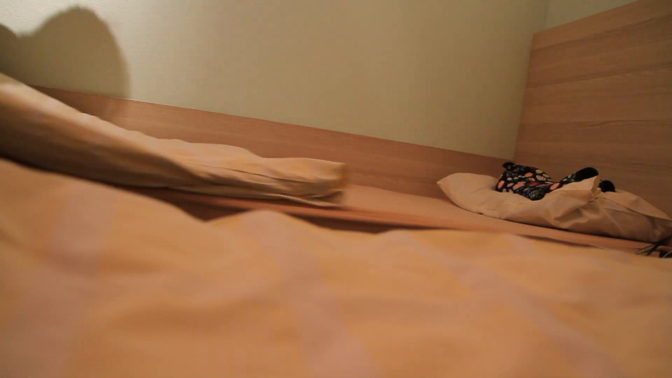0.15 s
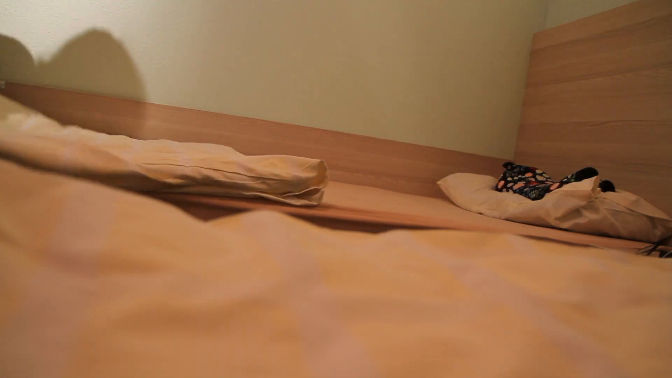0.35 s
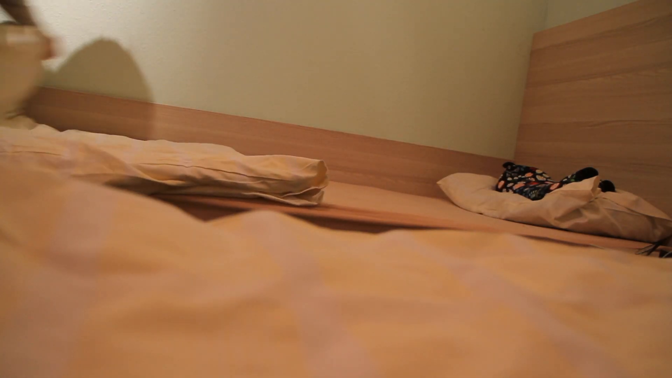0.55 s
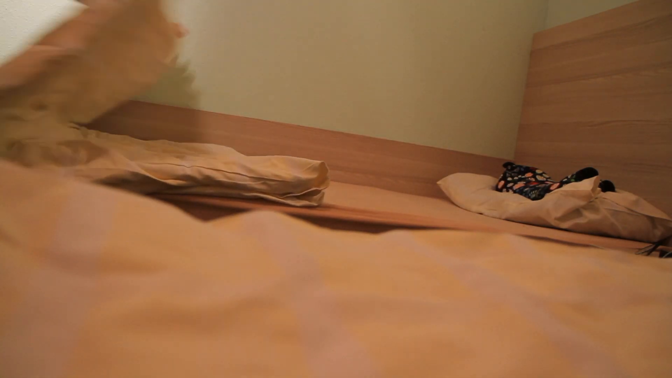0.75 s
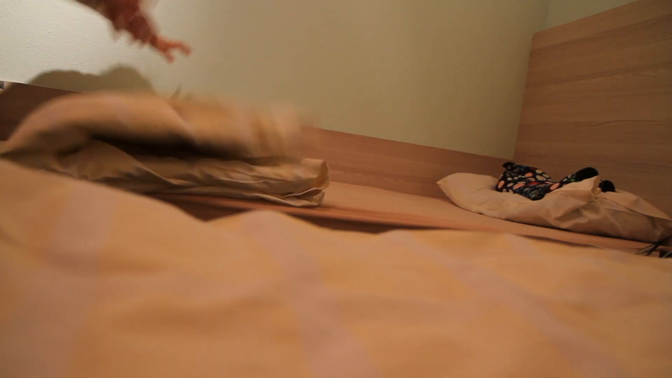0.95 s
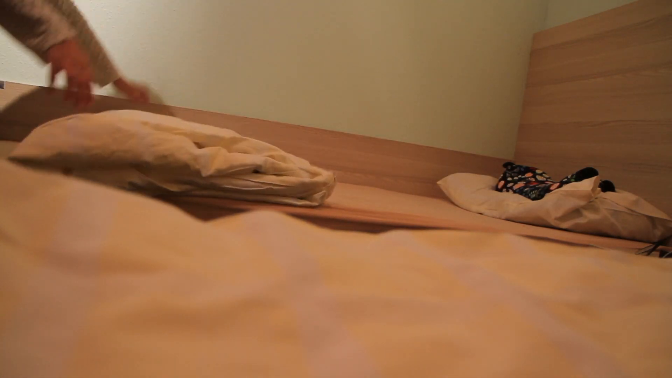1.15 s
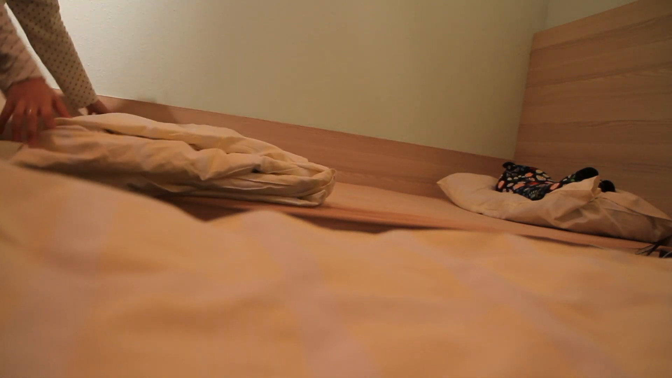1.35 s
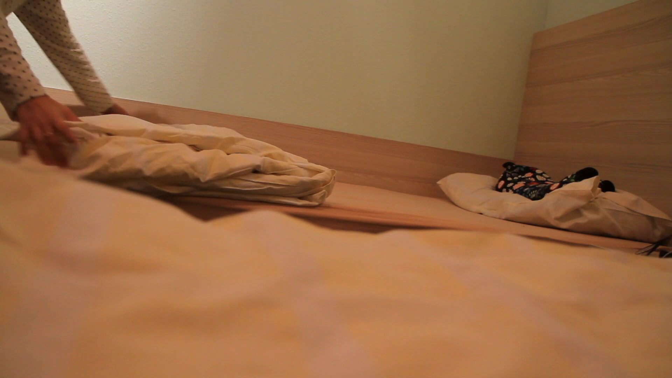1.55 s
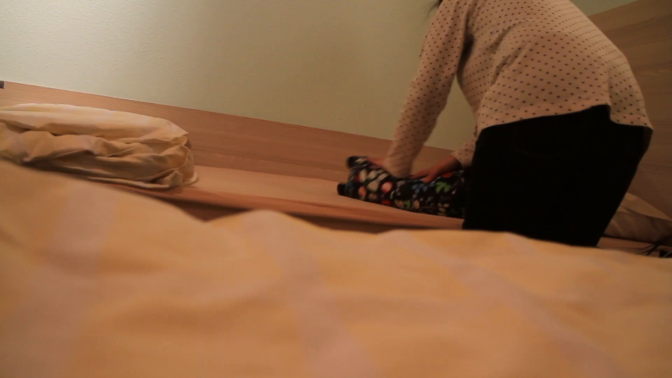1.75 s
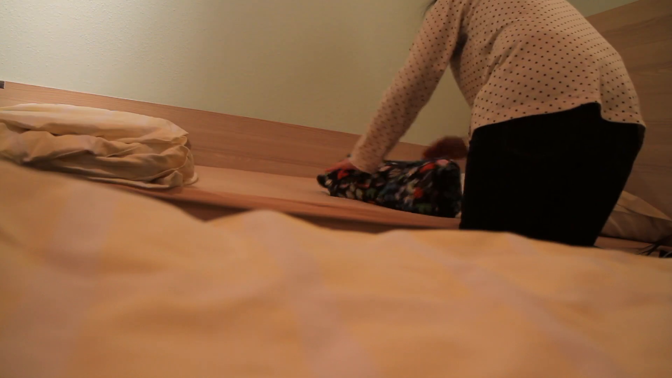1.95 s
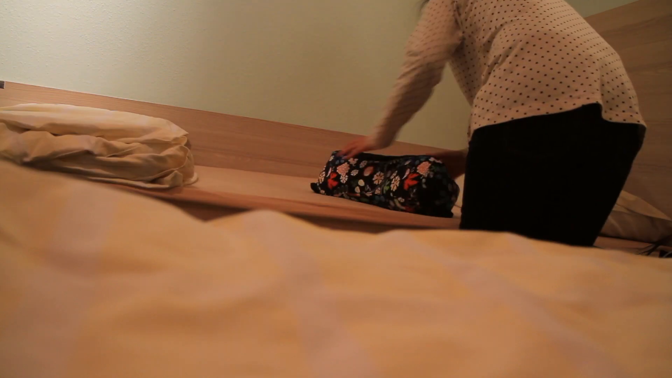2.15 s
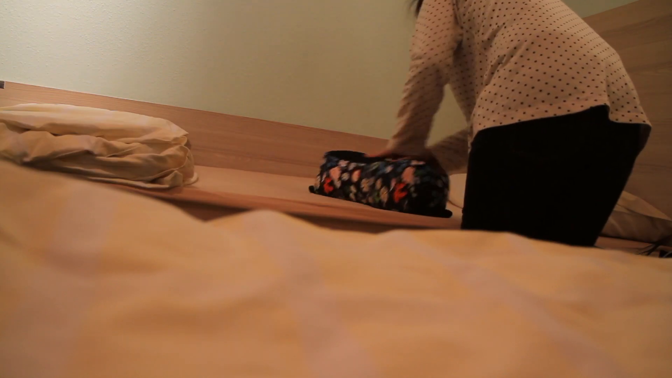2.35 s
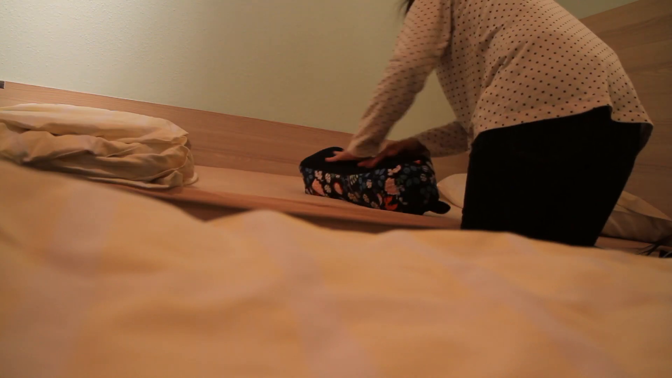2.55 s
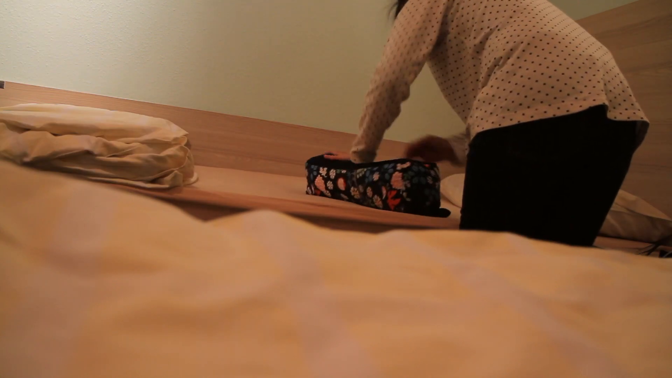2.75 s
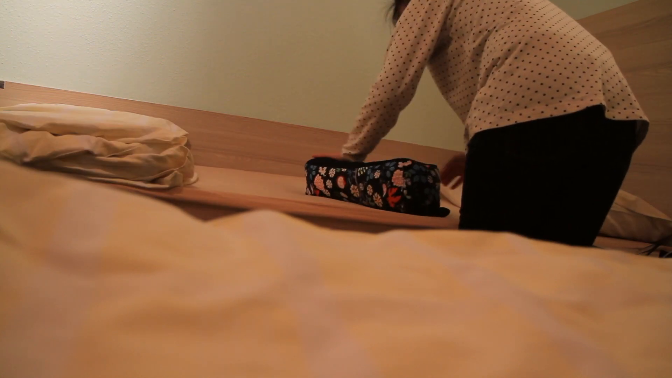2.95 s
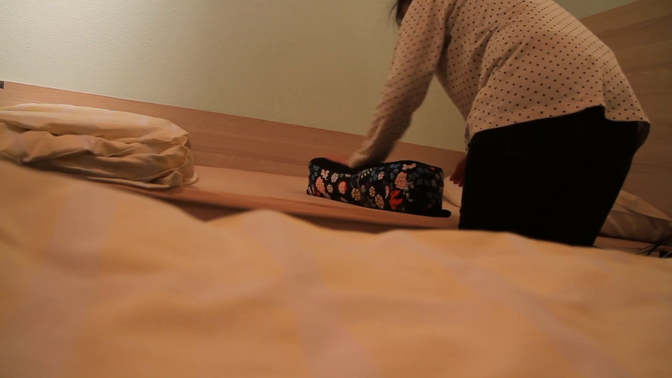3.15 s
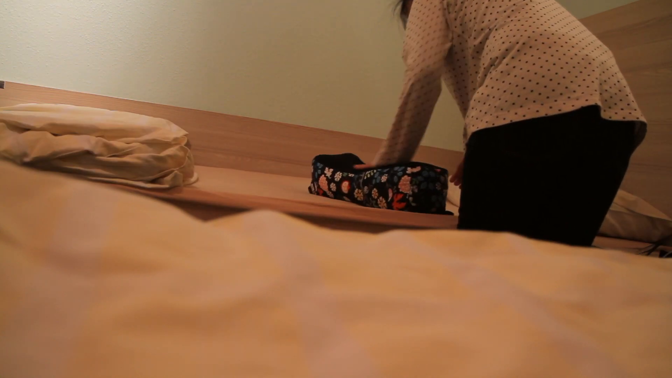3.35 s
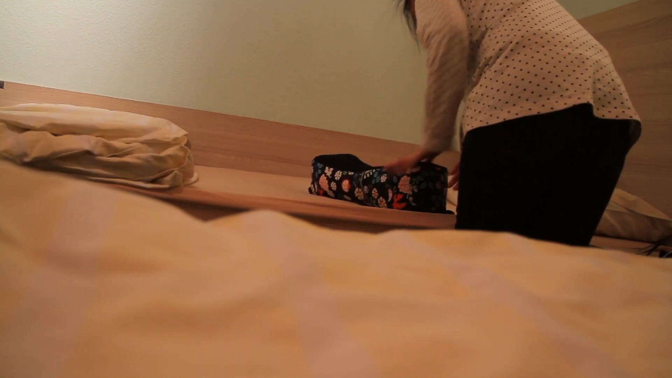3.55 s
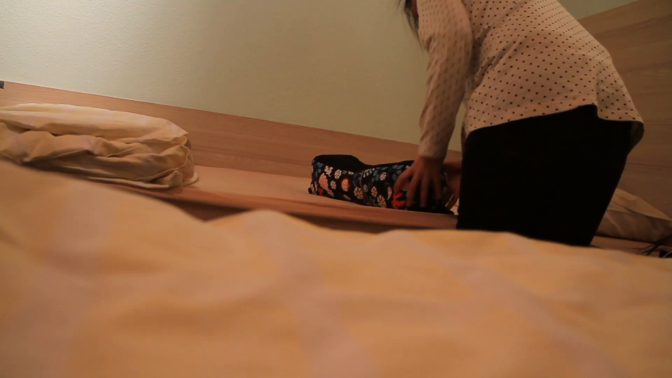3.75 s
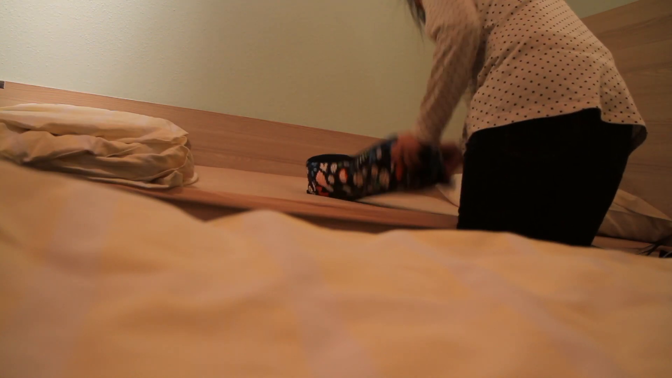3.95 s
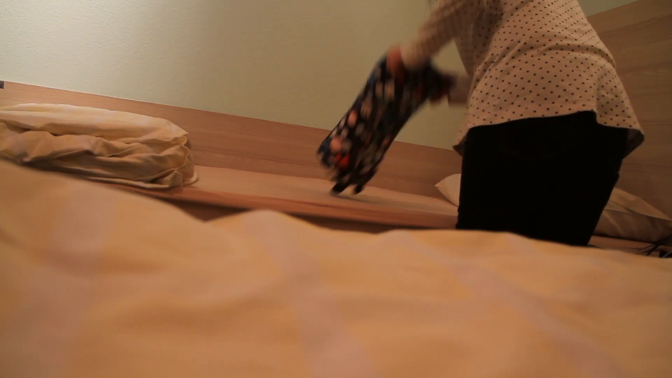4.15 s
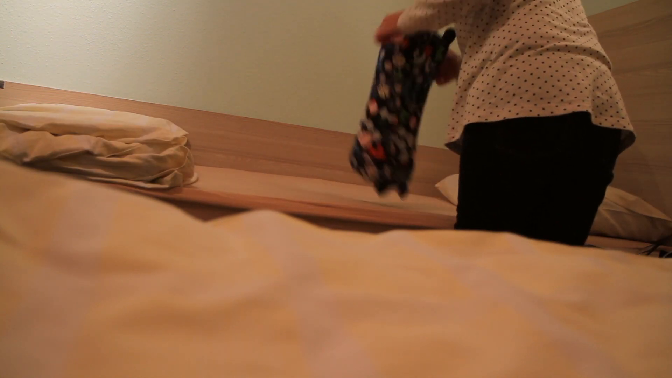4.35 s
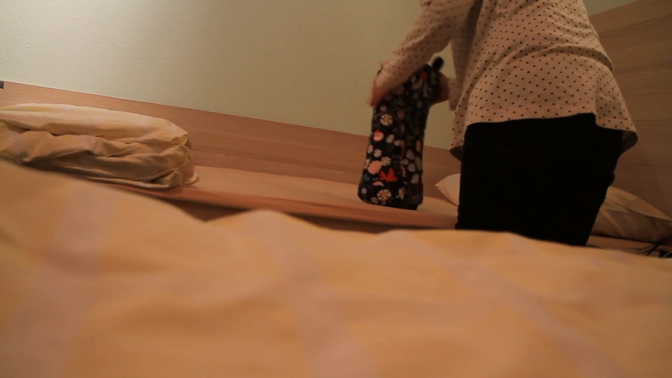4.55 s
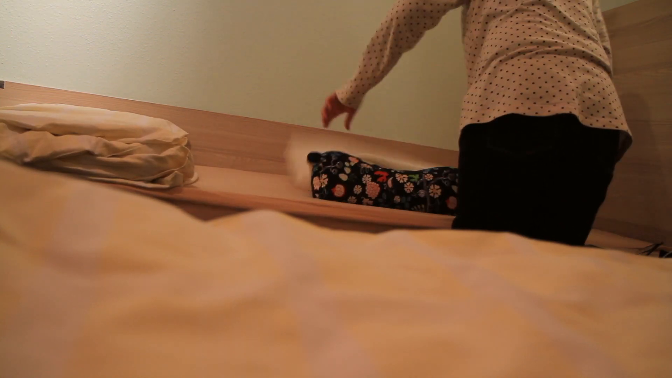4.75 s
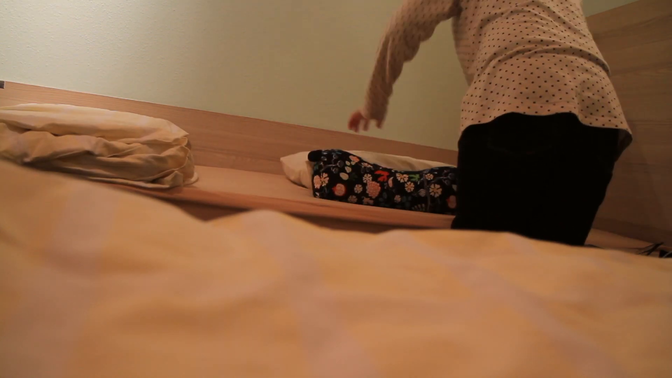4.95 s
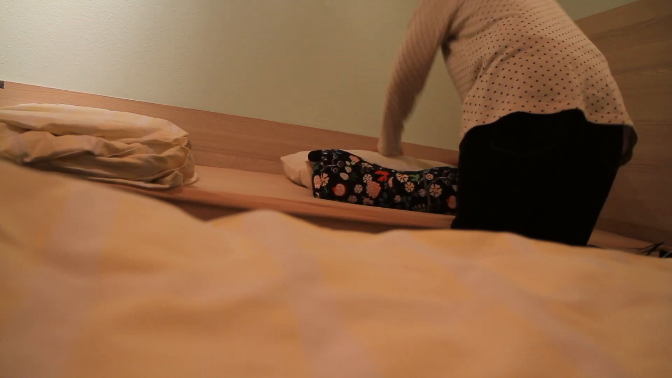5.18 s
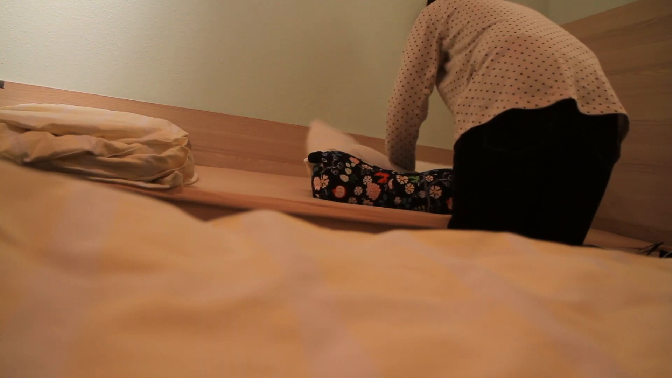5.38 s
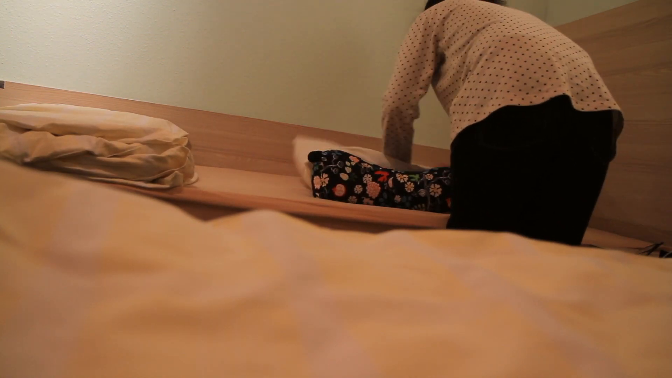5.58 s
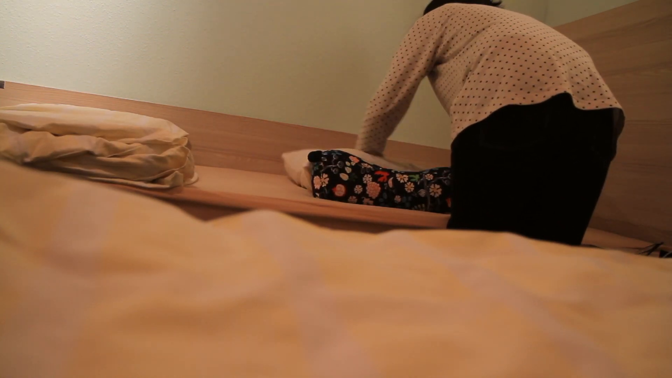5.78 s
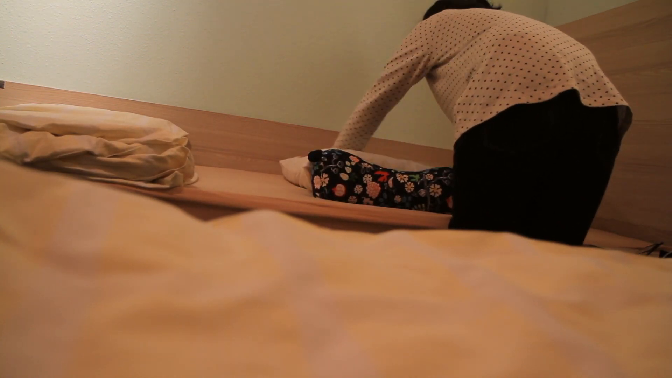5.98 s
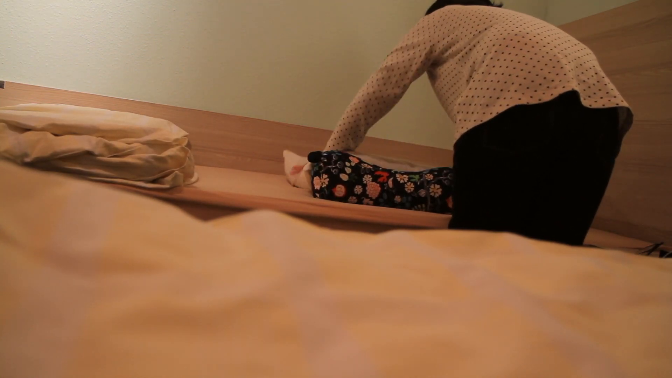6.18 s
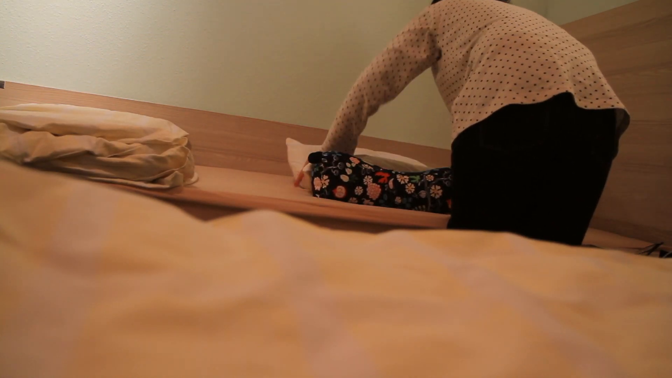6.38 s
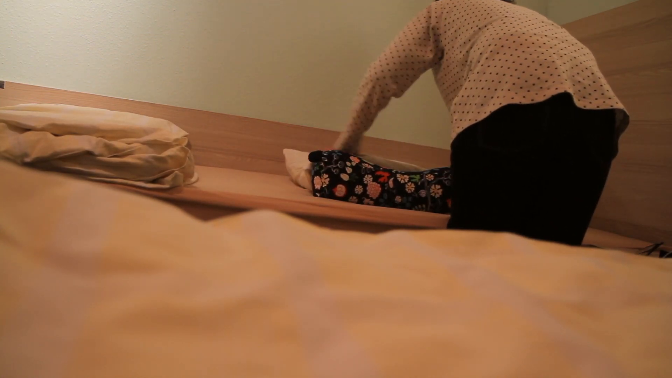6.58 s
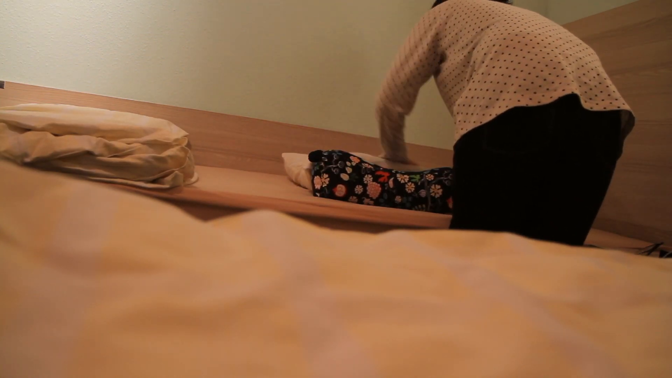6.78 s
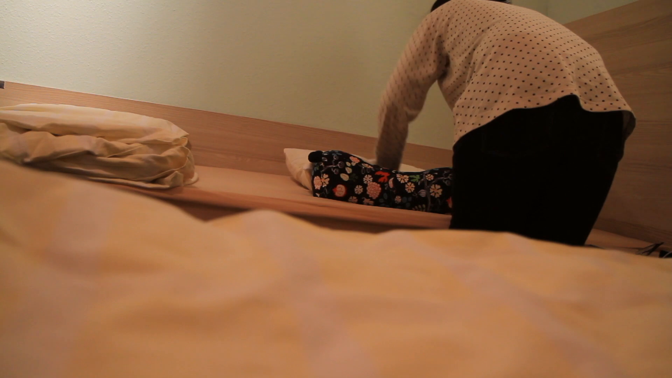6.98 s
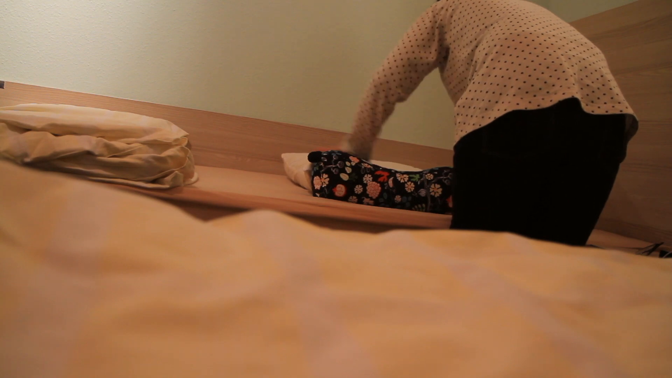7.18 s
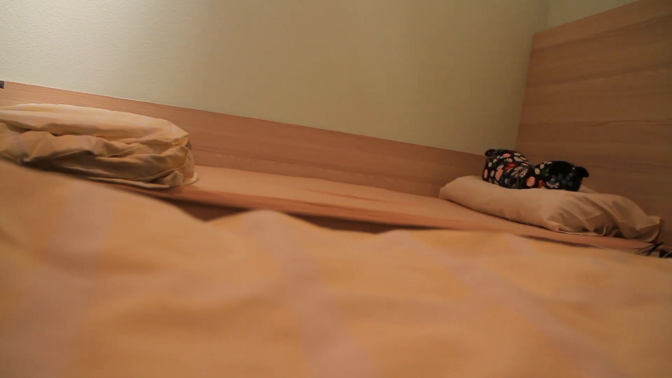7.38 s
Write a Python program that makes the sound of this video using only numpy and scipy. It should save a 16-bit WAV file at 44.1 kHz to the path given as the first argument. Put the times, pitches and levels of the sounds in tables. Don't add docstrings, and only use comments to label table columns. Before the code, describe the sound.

Soft cotton friction in uneven strokes, with dull mattress rumble underneath. Two gentle pillow thumps come early, a quiet pause, then steady brushing and patting of a cushion. Two small bumps lead to one dominant padded thud with a breathy burst of air, then a light pat and brisk smoothing. Close microphone, short dull room tail, low rumble, hiss, weak mechanical ticks and a barely audible high whine.

```python
import sys
import numpy as np
from scipy import signal
from scipy.fft import rfft, irfft
from scipy.io import wavfile
from scipy.ndimage import uniform_filter1d

SR = 44100
rng = np.random.default_rng(int(sys.argv[2]) if len(sys.argv) > 2 else 0)


def put_to_file(sound):
    columns = np.atleast_2d(sound).T
    safe = np.clip(columns, -1, 1)
    whole_steps = np.round(safe * 32767)
    wavfile.write(sys.argv[1], SR, whole_steps.astype(np.int16))


def ratio(d):
    e = np.asarray(d, float) / 20
    return 10 ** e


N = 327177
TIME = np.arange(N) / SR
FREQ = np.fft.rfftfreq(N, 1 / SR)


def unit(x):
    return x / np.sqrt(np.mean(x ** 2))


def colour(x, spectrum):
    hz, db = np.transpose(spectrum)
    gain_db = np.interp(np.log(FREQ + 1), np.log(hz), db)
    return irfft(rfft(x) * ratio(gain_db), N)


def band(x, hz, octaves):
    off = np.clip(np.log2((FREQ + 1) / hz) / octaves, -1, 1)
    return irfft(rfft(x) * np.cos(np.pi * off / 2) ** 2, N)


def walk(rate_hz):
    hold = int(SR / rate_hz)
    steps = np.repeat(rng.standard_normal(N // hold + 1), hold)
    slewed = uniform_filter1d(uniform_filter1d(steps, hold), hold)
    return unit(slewed[:N])


def ring(x, hz, t60):
    decay = np.log(1000) / (max(t60, .005) * SR)
    pole = np.exp(2j * np.pi * hz / SR - decay)
    return signal.lfilter([1], [1, -pole], x).imag


def add(out, s, burst):
    i = int(s * SR)
    out[i:i + len(burst)] += burst[:N - i]


# (frequency [Hz], density [dB/Hz])
QUIET_SPECTRUM = [(18, -45), (30, -4.5), (88, 1.5), (192, 1.5), (277, -1.5), (456, -3), (624, -3),
                  (730, -13), (855, -8.5), (974, -9.5), (1140, -3.5), (1920, -11), (5340, -15.5),
                  (14400, -27), (15600, -43)]
# (frequency [Hz], peak level [dB])
WHINE_TONES = [(15682, -65.5)]


def quiet():
    air = colour(rng.standard_normal(N), QUIET_SPECTRUM)
    octaves = [(hz, band(air, hz, 1)) for hz in 31 * 2 ** np.arange(10)]
    air = sum(x * ratio(min(300 / hz, 1.5) * walk(4.09)) for hz, x in octaves)
    whine = sum(ratio(db) * np.sin(2 * np.pi * hz * TIME) for hz, db in WHINE_TONES)
    return unit(air) * ratio(-52) + whine


# (time of top speed [s], speed-up [s], slow-down [s], rustle level [dB], fine weave re rustle [dB])
QUILT_HANDS = [
    (.03, .2, 0.18, -52, -5),
    (.22, 0.17, 0.1, -51.5, -6.5),
    (.73, 0.11, 0.1, -54, -3),
    (1.03, .06, 0.053, -58, -1.5),
    (1.27, 0.067, 0.098, -65, -1),
    (1.5, 0.27, 0.12, -65, 1),
]
BOLSTER_HANDS = [(1.58, 0.059, 0.11, -57.5, -1), (1.74, 0.11, 0.17, -50.5, -7.5),
                 (1.95, 0.19, 0.12, -49, -3), (2.13, 0.08, 0.032, -60, -8), (2.245, 0.029, 0.14, -50, -7.5),
                 (2.44, .11, 0.14, -50, -4.5), (2.54, 0.13, 0.19, -50.5, -3.5), (2.78, 0.13, 0.11, -52, -2),
                 (2.92, .17, 0.11, -49.5, -1.5), (3.14, 0.096, 0.06, -51.5, -4),
                 (3.26, 0.16, .12, -45.5, -4.5), (3.46, 0.13, 0.16, -46, -1.5),
                 (3.6, 0.06, 0.065, -50.5, -3), (3.76, 0.041, 0.063, -54.5, -2),
                 (3.88, 0.11, 0.23, -49, -6.5), (4.12, 0.11, 0.24, -47.5, -5), (4.465, 0.049, .09, -47, -5),
                 (4.58, 0.063, .08, -49.5, -9.5), (4.72, 0.096, 0.2, -52.5, -1.5)]
PILLOW_HANDS = [(4.88, 0.071, 0.12, -57, -9), (5.23, 0.064, 0.17, -51.5, -7.5),
                (5.43, .16, 0.12, -52, -3.5), (5.6, 0.11, 0.15, -57.5, -5),
                (5.735, 0.035, 0.078, -47.5, -4.5), (5.9, .13, 0.13, -45.5, -1),
                (6.05, .13, 0.12, -49.5, 0), (6.24, 0.19, 0.19, -45.5, -2), (6.44, 0.14, 0.14, -49.5, -3),
                (6.69, 0.13, 0.32, -50, -2), (7.0, 0.13, .15, -47, -2), (7.2, 0.18, 0.087, -48.5, -3),
                (7.3, .05, 0.043, -56.5, -2.5)]
COARSE_WEAVE_DB = [1.5, 2.5, 0.6]
COARSE_PER_FINE = -0.45
LIFT_DB = -3
STROKE_BLUNT, REST_DB = 1.46, -65


def hands():
    power = np.full(N, ratio(2 * REST_DB))
    coarse, fine = np.zeros(N), np.zeros(N)
    cloths = QUILT_HANDS, BOLSTER_HANDS, PILLOW_HANDS
    for strokes, cloth_coarse_db in zip(cloths, COARSE_WEAVE_DB):
        for s, rise, fall, db, fine_db in strokes:
            away = np.where(TIME < s, (s - TIME) / rise, (TIME - s) / fall)
            stroke = ratio(2 * db) * np.clip(1 - away ** 2, 0, 1) ** STROKE_BLUNT
            lift_db = LIFT_DB * away * (TIME > s)
            power = power + stroke
            coarse = coarse + stroke * (cloth_coarse_db + COARSE_PER_FINE * fine_db + lift_db)
            fine = fine + stroke * fine_db
    return 10 * np.log10(power), coarse / power, fine / power


def slips(scatter_db):
    size = np.minimum(rng.exponential(size=N), 5)
    return unit(rng.standard_normal(N) * ratio(scatter_db * size))


# (frequency [Hz], density [dB/Hz])
COTTON_SPECTRUM = [(180, -17), (300, 1.5), (348, -10), (391, 1.5), (425, -8), (485, -2.5), (721, -5),
                   (796, -1.5), (954, -5), (3040, -3), (8600, -8.5), (12200, -5.5), (13900, -6.5),
                   (15600, -14)]


def rustle(level_db, coarse_db, fine_db):
    cloth = colour(slips(1.33), COTTON_SPECTRUM)
    middle_bins = rfft(cloth)[(FREQ > 2500) & (FREQ < 8000)]
    middle_rms = np.sqrt(np.sum(np.abs(middle_bins) ** 2) * 2) / N
    steady_coarse, steady_fine = np.median(coarse_db), np.median(fine_db)
    folds, out = 0.5 * walk(15), 0
    for hz in 250 * 2 ** np.arange(0, 6.1, .5):
        coarse = np.clip(np.log2(3500 / hz), 0, 1) * (coarse_db - steady_coarse)
        fine = np.clip(np.log2(hz / 6000), 0, 1) * (fine_db - steady_fine)
        strip = band(cloth, hz, .5)
        out = out + strip * ratio(coarse + fine + folds + 0.63 * walk(18))
    return out / middle_rms * ratio(level_db)


# (time [s], load level [dB], length [s])
BODY_LEANS = [(.5, -56, 0.055), (0.713, -50, 0.12), (1.03, -45, 0.088), (1.807, -51, 0.26),
              (2.157, -52, 0.051), (2.344, -52.5, 0.056), (2.683, -52, 0.09), (2.5, -59, 0.049),
              (3.627, -57, 0.098), (7.224, -54, .08), (3.266, -56, 0.056), (3.426, -48.5, 0.059),
              (3.85, -53.5, 0.054), (4.46, -42, 0.065), (4.576, -47, 0.047), (4.9, -49.5, 0.21),
              (5.212, -46, 0.08), (5.377, -53.5, 0.41), (5.736, -50, 0.14), (6.028, -55, 0.047),
              (6.21, -50, 0.074), (6.64, -51, 0.097), (6.83, -47.5, 0.056), (6.74, -52, .06),
              (6.92, -53, 0.044), (7.103, -52.5, 0.12), (7.29, -52.5, 0.055)]


def load(level_db):
    leans = sum(ratio(2 * db) * np.exp(-(2 * (TIME - s) / length) ** 2) for s, db, length in BODY_LEANS)
    hand_load_db = level_db - 11
    return 10 * np.log10(leans + ratio(2 * hand_load_db))


# (frequency [Hz], density [dB/Hz])
STUFFING_SPECTRUM = [(21, -66), (35, -36), (45, -9), (53, -13.5), (102, 3), (238, -3.5), (320, -4),
                     (350, -13), (400, -5), (520, -12), (880, -120)]


def mattress(load_db):
    stuffing = colour(slips(0.67), STUFFING_SPECTRUM)
    octaves = [band(stuffing, hz, 1) for hz in 40 * 2 ** np.arange(5)]
    lumps = sum(x * ratio(1.3 * walk(9.8)) for x in octaves)
    packed_db = -47
    return unit(lumps) * ratio(np.minimum(load_db, packed_db))


def faint_ticks(count):
    when, size, pitch = rng.random((count, 3)).T
    level_db = -46 - 4 * size
    ring_hz = 1120 + 83 * (2 * pitch - 1)
    return list(zip(when * N / SR, level_db, ring_hz))


# (time [s], peak level [dB], ring [Hz])
CLEAR_TICKS = [(0.1285, -43.5, 1030), (0.3487, -44.5, 1110), (0.5184, -45.5, 1160), (0.5861, -46, 1120),
               (0.6407, -45, 1054), (0.892, -46, 1120), (0.9363, -45, 1094), (1.1516, -46, 1050),
               (1.4104, -47, 1140), (1.459, -43, 1150), (1.62, -46, 1120), (2.0033, -45, 1060),
               (2.139, -46, 1040), (2.3006, -43, 1010), (3.4585, -44, 1090), (3.7748, -43.5, 1105),
               (3.894, -44, 1040), (4.0483, -42, 1260), (4.719, -45, 1130), (4.936, -44, 1120),
               (5.036, -47, 1180), (5.271, -43, 1170), (5.3643, -44, 1070), (5.396, -42.5, 1030),
               (5.487, -43, 1120), (5.5286, -46, 1120), (5.9953, -45, 1050), (6.34, -43, 1110),
               (5.061, -45, 1070), (7.0206, -46, 1070)]


def ticks():
    out, knock = np.zeros(N), np.hanning(int(0.002 * SR))
    for s, db, hz in CLEAR_TICKS + faint_ticks(count=40):
        push = knock * np.cos(2 * np.pi * hz * TIME[:len(knock)])
        push = np.pad(push, (0, 2000))
        tick = ring(push, hz, 0.045)
        add(out, s, ratio(db - 0.5) * tick / np.abs(tick).max())
    return out


# (time of peak [s], level [dB], fall time [s], brightest frequency [Hz], tilt above it [dB/octave])
AIR_PUFFS = [(.665, -51.5, 0.33, 2500, -33), (.70, -49.5, 0.39, 2230, -33), (.7, -53, .4, 5500, -40),
             (1.003, -44, 0.05, 1400, -11), (1.016, -42, 0.16, 500, -7), (4.463, -39.5, 0.19, 700, -3.5),
             (4.575, -41.5, 0.16, 800, -3), (4.694, -41, 0.026, 2500, -16), (4.746, -37, .05, 600, -5),
             (4.791, -27, 0.21, 403, -6), (4.796, -33, 0.23, 1500, -7), (4.808, -33.5, 0.11, 2400, -34),
             (5.197, -41, 0.039, 1200, -10), (5.203, -43.5, 0.23, 613, -34), (.782, -48, 0.022, 3500, -30),
             (2.232, -53, .05, 2600, -10)]


def puffs():
    out = 0
    for s, db, fall, hz, tilt_db in AIR_PUFFS:
        rise = fall * 0.052 * ratio(0.55 * (db + 41))
        spectrum = [(hz / 4, 0.66 * tilt_db - 12), (hz, 0), (hz * 4, 2 * tilt_db), (hz * 32, 5.8 * tilt_db)]
        air = unit(colour(slips(3.1), spectrum))
        swelling = np.exp(-((TIME - s) / rise) ** 2)
        escaping = ratio(-60 * np.abs(TIME - s) / fall)
        out = out + ratio(db) * np.where(TIME < s, swelling, escaping) * air
    return out * ratio(0.4 * walk(60))


def thud(push, hz, t60):
    patch = ring(ring(push, hz, t60), hz, 0.19 * t60)
    return patch / patch.max(), patch.argmax() / SR


# (time [s], peak level [dB], low ring [Hz], upper ring [Hz], upper ring re peak [dB])
PILLOW_PATCHES = [(0.691, -38, 151, 550, -14), (0.721, -34, 152, 288, -12), (0.77, -37, 158, 304, -13),
                  (0.996, -38, 205, 310, -5), (1.013, -32, 124, 291, -12), (1.022, -36, 108, 540, -1),
                  (1.044, -33, 154, 380, -13), (4.43, -34.5, 88.3, 409, -24), (4.442, -33.5, 113, 600, -8),
                  (4.564, -53, 278, 310, -13), (4.581, -31.5, 110, 347, -13), (4.745, -41.5, 278, 500, 9.5),
                  (4.76, -25, 190, 510, -2.5), (4.769, -11, 205, 274, -9), (4.785, -9, 200, 296, -8),
                  (4.798, -21, 102, 452, 0.5), (4.811, -17, 144, 450, -15), (4.83, -17, 93.5, 295, -3.5),
                  (4.839, -27.5, 123, 331, -3), (4.855, -33, 95, 342, 0), (4.878, -34, 267, 291, -11),
                  (5.194, -26.5, 181, 286, -10.5), (5.21, -25.5, 136, 615, -13),
                  (5.227, -35.5, 143, 285, -2)]
# (frequency [Hz], level [dB], t60 [s])
FRAME_MODES = [(72, -22.5, .2), (113, -21, 0.025), (180, -4, 0.057), (310, 7, 0.085), (468, -29, .08),
               (660, -42, .07)]


def landings():
    own, pushes, span = np.zeros(N), np.zeros(N), int(.3 * SR)
    for s, db, low_hz, upper_hz, upper_db in PILLOW_PATCHES:
        for hz, gain in (low_hz, ratio(db - 3.5)), (upper_hz, ratio(db + upper_db - 1.0)):
            push = np.sin(np.pi * np.clip(TIME[:span] * 2 * hz, 0, 1))
            patch, build = thud(push, hz, t60=.06)
            add(own, s + 0.00373 - build, gain * patch)
            add(pushes, s, gain * push / push.sum())
    frame = sum(ratio(db) * ring(pushes, hz, t60) for hz, db, t60 in FRAME_MODES)
    return own + ratio(-25) * frame


def room(x):
    t60, tail_db = 0.29, -13.5
    t = TIME[:int(.5 * SR)]
    tail = rng.standard_normal(len(t)) * ratio(-60 * t / t60) * (t > .004)
    tail = signal.lfilter([1], [1, -.4], tail)
    tail = tail / np.linalg.norm(tail)
    return x + ratio(tail_db) * signal.fftconvolve(x, tail)[:N]


def channel_slips(x, count):
    low_hz, octaves, width, frame = 4800, 1.7, .09, 1024
    right, fade = x[1].copy(), signal.windows.tukey(frame + 256, .4)
    for when, height in rng.random((count, 2)):
        i = int(when * (N - 3 * frame)) + frame
        hz = low_hz * 2 ** (octaves * height)
        edges = [hz * (1 - width), min(hz * (1 + width), 15700)]
        sos = signal.butter(4, edges, "band", fs=SR, output="sos")
        strip = signal.sosfiltfilt(sos, x[1, i - frame:i + len(fade)])
        right[i:i + len(fade)] += fade * (strip[:len(fade)] - strip[frame:])
    return np.array([x[0], right])


def scene():
    level_db, coarse_db, fine_db = hands()
    bed = rustle(level_db, coarse_db, fine_db) + mattress(load(level_db)) + landings() + puffs()
    return np.tile(room(bed) + ticks() + quiet(), (2, 1))


def low_pass(x):
    return signal.sosfilt(signal.butter(12, 16570, fs=SR, output="sos"), x)


def record(dry):
    x = colour(dry, [(25, -7), (40, -16), (52, -14.5), (66, 0.0)])
    x = irfft(rfft(x) * (FREQ < 15760), N)
    mix = channel_slips(x, count=34)
    return low_pass(mix)


dry = scene()
out = record(dry)
put_to_file(out)
```